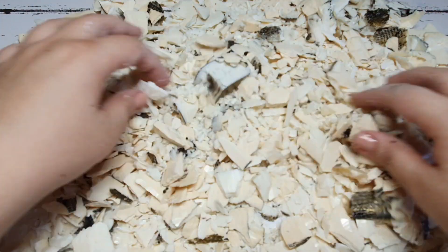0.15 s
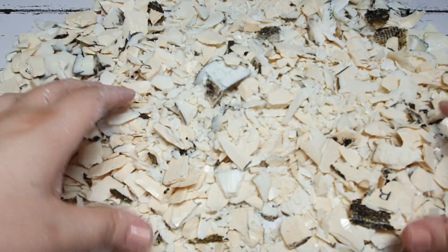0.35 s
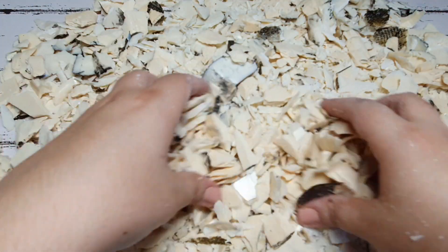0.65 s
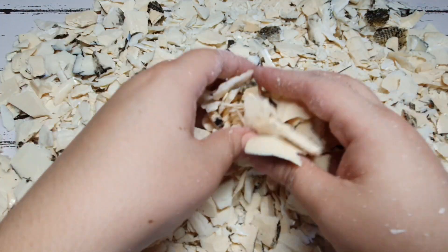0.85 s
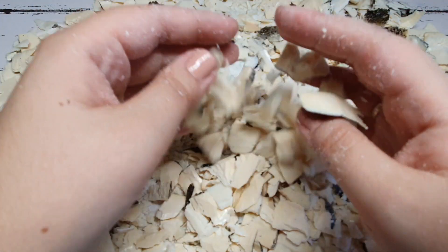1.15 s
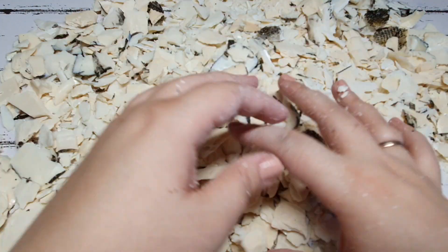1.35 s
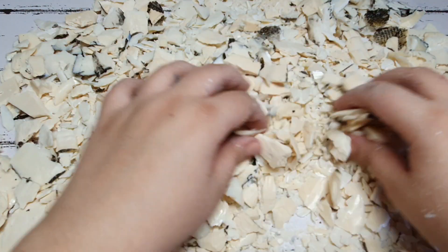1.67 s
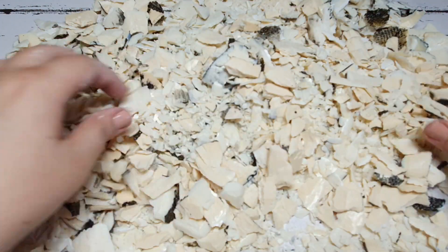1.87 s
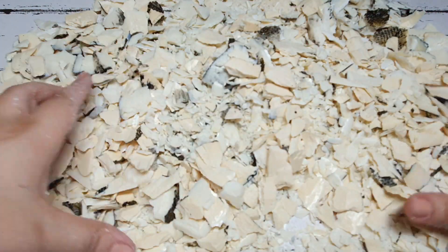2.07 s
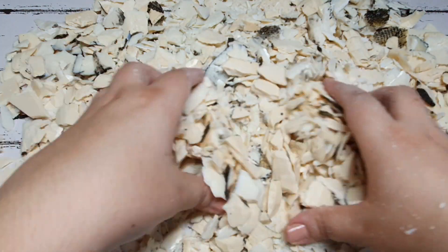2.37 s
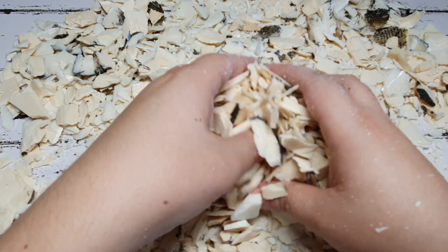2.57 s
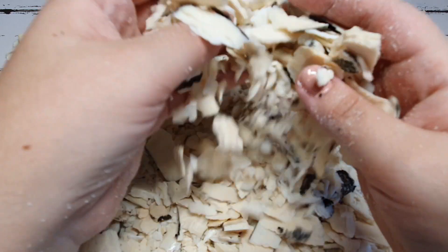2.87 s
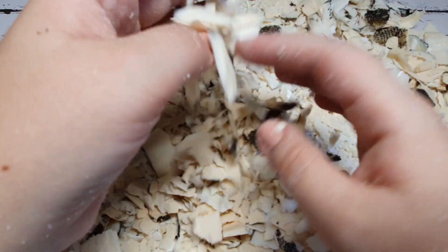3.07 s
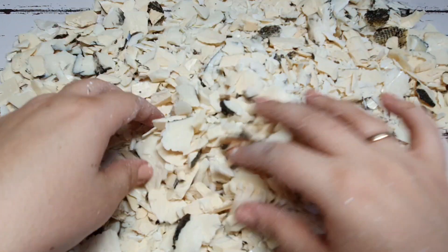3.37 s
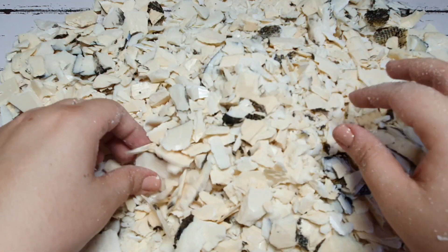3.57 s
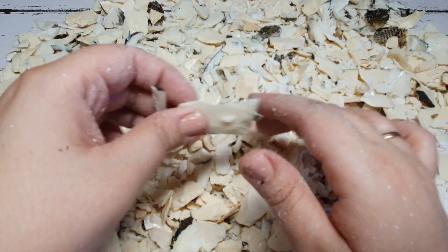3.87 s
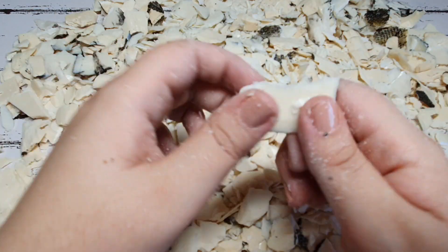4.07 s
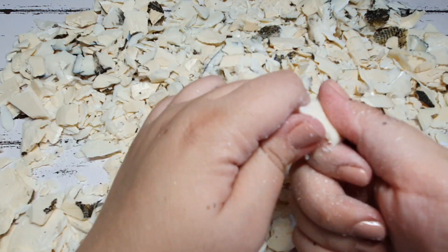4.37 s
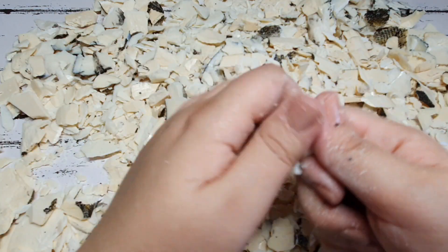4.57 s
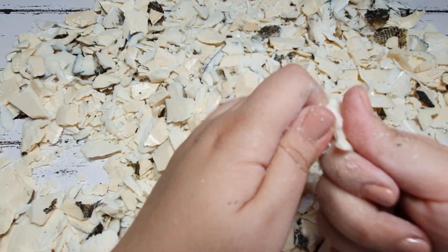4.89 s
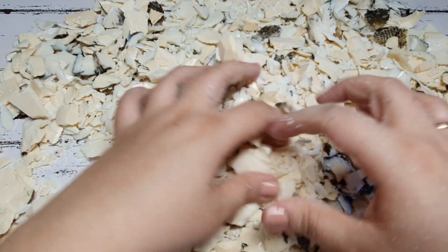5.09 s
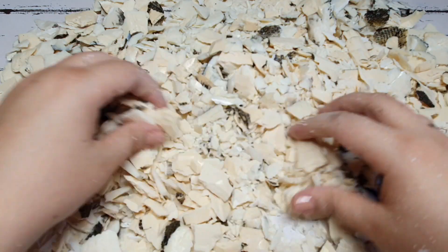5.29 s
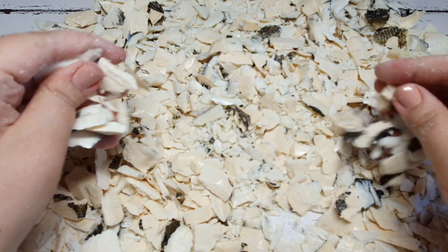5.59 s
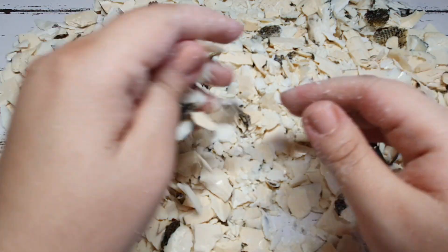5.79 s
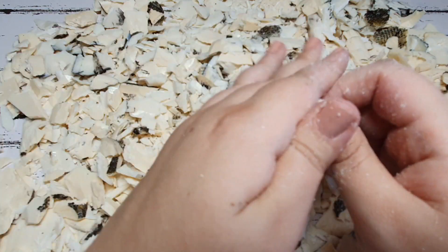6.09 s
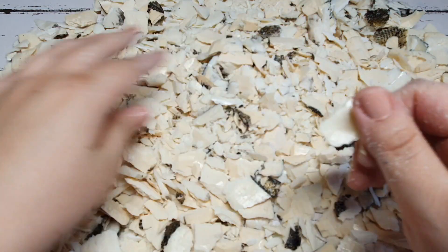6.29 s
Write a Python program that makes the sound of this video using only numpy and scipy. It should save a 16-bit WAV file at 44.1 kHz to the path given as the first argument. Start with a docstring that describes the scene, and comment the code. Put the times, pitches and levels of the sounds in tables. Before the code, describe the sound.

Dry, crunchy rustling of thin soap chips, gathered in swishing sweeps and dropped in crackling showers, recorded very close in a small room. The hollow tabletop booms under the hands, strongest at one thump early on and a cluster near the end. Between them comes near-silence with two loud sharp cracks. Low hum, rumble and faint hiss stay underneath, and the loudest peaks sound slightly overloaded.

```python
"""Dry soap shards crackle first, raked by two hands on a hollow table top close to one microphone.
Each shard contact excites a short damped resonance; single pieces snap with fracture noise and a ring.
The table booms as hands and raked shards drive its modes, and jolts add damped low swings.
A mains hum, room rumble and microphone hiss lie below; loud moments overload the recorder."""
import sys
import numpy as np
from scipy import signal
from scipy.fft import rfft, irfft
from scipy.io import wavfile
from scipy.ndimage import uniform_filter1d

SR = 44100
rng = np.random.default_rng(int(sys.argv[2]) if len(sys.argv) > 2 else 0)


def wav_record(signal):
    """Record a signal, one row per channel, as 16-bit PCM in the file named by sys.argv[1]."""
    frames = np.transpose(np.atleast_2d(signal))
    bounded = np.clip(frames, -1, 1)
    # unit amplitude maps onto the largest positive 16-bit level
    quanta = np.round(bounded * 32767).astype(np.int16)
    wavfile.write(sys.argv[1], SR, quanta)


N = 284004

# Movements of shards in the heap. Each row: start in seconds, rise in seconds, hold in seconds,
# fall in dB per second, then the levels of fine crumbs, flakes and big chunks in dB.
STROKES = [(-0.25, .36, 0.032, 57, -27, -28, -28.5), (0.25, 0.02, 0.15, 80, -53, -47, -35.5),
           (0.44, 0.051, 0.054, 29, -30, -29.5, -24.5), (0.87, 0.019, 0.005, 237, -31.5, -33, -34),
           (0.96, 0.026, 0.0075, 193, -37.5, -33.5, -61.5), (1.07, .11, 0.012, 248, -25.5, -23, -26),
           (1.21, 0.035, 0.0092, 85, -29.5, -27.5, -28), (1.45, 0.053, 0.023, 41, -32.5, -32.5, -23),
           (1.52, .10, 0.23, 104, -29.5, -32, -31), (1.98, 0.085, 0.045, 60, -33.5, -35, -30),
           (2.10, 0.047, 0.034, 66, -31.5, -27, -23), (2.16, 0.11, 0.049, 56, -30.5, -30, -28),
           (2.36, 0.082, 0.062, 17, -33, -34, -36.5), (2.72, 0.18, 0.025, 72.5, -28, -27.5, -30.5),
           (2.99, 0.047, 0.0081, 170, -20.5, -23.5, -26.5), (3.09, 0.036, 0.043, 108, -24.5, -27, -28.5),
           (3.27, 0.063, 0.23, 106, -35, -34, -33.5), (3.495, 0.003, 0.012, 161.5, -36.5, -17, -18.5),
           (3.58, 0.017, 0.14, 101, -47.5, -53, -44.5), (3.74, 0.061, 0.033, 186, -62, -57, -47.5),
           (4.13, 0.0045, 0.0054, 191, -44.5, -41.5, -45.5),
           (4.242, 0.0026, 0.0092, 190, -37.5, -43.5, -39), (4.717, 0.0072, 0.0081, 176, -42, -44, -36),
           (4.89, 0.029, 0.027, 90, -47, -50.5, -51), (4.98, 0.022, 0.14, 40, -43, -43, -40.5),
           (5.05, 0.19, .14, 45, -31, -32.5, -27.5), (5.59, 0.051, 0.093, 326, -33, -35, -48),
           (5.77, 0.096, 0.0092, 215, -39.5, -40, -40.5), (5.92, 0.049, 0.008, 187, -32.5, -37.5, -29),
           (6.02, 0.085, 0.027, 72, -47, -53, -51), (6.305, 0.0056, 0.0086, 132, -48, -51, -42.5),
           (6.405, 0.012, 0.028, 103, -39, -32, -21)]
# The heap settling by itself. Columns: levels of crumbs, flakes and chunks in dB.
HEAP_AT_REST_DB = (-58.5, -81, -68)
# Contact spectra of three shard sizes. Each row: frequency in Hz, relative level in dB.
CRUMB_SPECTRUM = [(4500, -4), (6400, -6), (9000, -6.5), (11300, -12.5), (14000, -15), (16000, -38)]
FLAKE_SPECTRUM = [(1800, 2.5), (2600, 7.5), (3500, 0.5), (4500, 0.5)]
CHUNK_SPECTRUM = [(450, 2), (700, -2.5), (1050, 6), (1400, 1), (2000, -4.5)]
# Single pieces breaking or landing. Each row: start in seconds, level of the whole event in dB,
# dull part in dB and bright part in dB (both before a fixed offset), ring of the piece in Hz.
SNAPS = [(0.257, -16.5, 8, -15, 3200), (0.425, -17.5, 8, -5, 1960), (0.495, -20, -12.5, 6, 4000),
         (0.636, -10.5, -1, -5, 2720), (0.848, -9.5, 2, -23, 2200), (1.001, -7.5, -13, -15.5, 6030),
         (1.179, -13, 6, -6.5, 2900), (1.236, -1.5, -26, -13, 3030), (1.246, -5, -18, -6.5, 6950),
         (1.258, -4, -10, -9, 2730), (1.289, -9, -17, -19, 3850), (1.305, -2.5, -7.5, -9, 2830),
         (1.65, -11, -10, -15, 6000), (1.658, -2.5, 10.5, -21, 3330), (1.684, -17, -20, -9, 5200),
         (1.741, -13, -20, -7, 8750), (1.784, -7, 1, -18, 1850), (1.891, -8, -23, -1.5, 3200),
         (2.042, -13, -31, -0.5, 4600), (2.141, -15.5, 12.5, -18, 2350), (2.17, -11, 9, -17, 2010),
         (2.43, -13.5, -20, -1, 5800), (2.886, -1, -21, -22, 3380), (3.015, -2.5, -16, -24.5, 2340),
         (3.027, -3.5, -17, -16, 2570), (3.062, -4.5, -32, -4, 4340), (3.104, -7, -3, -6, 4790),
         (3.115, -8, -20, -6, 7250), (3.128, -2.5, -15, -11, 2850), (3.137, -1, -25, -8, 2800),
         (3.193, -3, -2.5, -4.5, 6500), (3.249, -19, 12, 0, 3080), (3.412, -22, -6, 5, 4330),
         (3.498, 8, 2.5, -36, 3180), (3.513, -14, 3, -4, 4300), (3.798, -34, 14, -2, 2300),
         (3.862, -33, -8, -22, 2700), (4.113, -33.5, -20, -1, 6470), (4.130, -15.5, -16, -19, 5430),
         (4.133, -21, -1.5, -8, 4430), (4.137, -21.5, -21, 2, 8860), (4.241, -3, -11.5, -1.5, 4860),
         (4.679, -33, -25, -7, 8410), (4.691, -28, -5, 6.5, 2800), (4.693, -14.5, -8, 2, 2780),
         (4.7159, 1, 1.5, -1, 7320), (4.955, -25.5, -24, -3, 5070), (4.902, -35, -21, 7, 6940),
         (5.001, -23, -15, -4, 8920), (5.011, -12.5, -20, -26, 2750), (5.113, -15, 2, -8, 5010),
         (5.222, -19.5, -4, 4, 4300), (5.377, 4.5, -8.5, -22, 3350), (5.421, -12, -8, -15, 3970),
         (5.503, -4, -31, -6, 5760), (5.619, -19, -26, 4, 7720), (5.641, -15, -6, 3.5, 3570),
         (5.648, -9, -22, -4, 6140), (5.663, -13, -18, -8, 4000), (5.699, -8.5, -22, -14, 6000),
         (5.717, -4, -4.5, -7, 5600), (5.774, -8.5, -33, -4.5, 8350), (5.83, -19, -15, -5, 5300),
         (5.847, -18, -26, -4, 6250), (5.857, -15.5, -16, -6, 2470), (5.964, -13, -5, -6, 2340),
         (6.008, -12.5, -6, -2, 2430), (6.046, -18.5, -33, 4.5, 6700), (6.064, -28.5, -28, 8, 8800),
         (6.097, -27, 4, 4.5, 7900), (6.108, -24, -8, 0, 2920), (6.305, -19.5, 5, -7, 5370),
         (6.412, -13.5, -8, -5, 2600)]
# A hand comes down or pushes on the table. Each row: start in seconds, rise in seconds, hold in seconds,
# fall in dB per second, then the levels of first mode, second mode, upper modes and slow sway in dB.
PRESSES = [(0.11, .07, 0.035, 98, -25.5, -50, -37, -35), (0.28, 0.13, 0.04, 56.5, -31, -37, -33, -29),
           (0.55, .05, 0.019, 57, -32.5, -33, -32, -30),
           (0.93, 0.012, 0.052, 346, -21.5, -42.5, -27.5, -30),
           (1.17, 0.11, 0.023, 120, -38, -29, -35, -32), (1.48, 0.017, 0.027, 296, -8, -7.5, -14.5, -16),
           (1.53, 0.018, 0.0067, 358, -17, -6, -24, -28),
           (1.575, 0.018, 0.024, 248, -49, -11.5, -27, -20.5),
           (1.78, 0.093, 0.017, 110, -33, -37, -37, -27), (1.995, 0.018, 0.031, 358, -26.5, -55, -56, -17),
           (2.08, 0.1, 0.041, 50, -24.5, -60, -41, -30), (2.2, 0.095, 0.015, 87, -46, -37, -31, -41),
           (2.9, 0.12, 0.25, 30, -36.5, -32.5, -39, -29.5), (5.12, 0.021, 0.055, 98, -39, -31, -38, -36),
           (5.238, 0.014, 0.014, 278, -14, -9, -31, -26), (5.27, 0.057, 0.009, 190, -18.5, -24, -40, -34),
           (5.405, 0.02, 0.033, 143, -32, -37, -17, -28.5),
           (5.428, 0.016, 0.032, 300, -5.5, -16.5, -25, -20), (5.48, 0.025, 0.015, 302, -3, -24, -25, -20),
           (5.57, 0.015, 0.011, 200, -28, -33, -36, -20), (5.62, 0.016, 0.044, 183.5, -8, -8, -22, -10),
           (5.72, 0.067, 0.014, 81, -23, -48, -54, -33), (5.93, 0.014, 0.0077, 131, -49, -30.5, -37, -29.5),
           (6.40, 0.029, 0.026, 100, -49, -34, -29, -39)]
# The same four table parts with the hands off. Columns: levels in dB.
TABLE_AT_REST_DB = (-61, -59, -56.5, -49)
# The four parts under raking. Columns: levels in dB relative to the weaker of crumbs and chunks.
RUB_DB = (-12, -1.5, -5.5, -6)
# Clear table modes. Columns: frequency in Hz, rms pitch wander in Hz, rms level flutter in dB.
FIRST_MODE = (119, 2, 1.5)
SECOND_MODE = (207, 7, 2.0)
THIRD_MODE = (341, 4, 2.0)
# Broad table modes under light touch. Each row: frequency in Hz, width in Hz, relative level in dB.
SECOND_RUMBLE = [(157.2, 6.4, -8), (185, 96, -1.5), (248.7, 18.5, -3.5)]
UPPER_RUMBLE = [(316.3, 75, 5.5), (452, 57, 0), (528, 78, -3.5)]
# Slow sway of the table. Columns: frequency in Hz, width of each of two filter passes in Hz.
TABLE_SWAY = (80, 35)
# Jolts through the table. Each row: start in seconds, starting level in dB, starting pitch in Hz.
JOLTS = [(4.241, -6.5, 250), (4.716, 0, 270), (6.425, -12.5, 180)]
# Shape of the rumble and hiss. Each row: frequency in Hz, relative spectral level in dB.
ROOM_NOISE = [(30, -24.5), (60, -30), (120, -8.5), (250, -9.5), (400, -45.5), (1000, -63), (3500, -59),
              (5500, -35), (9000, -36.5), (12000, -38), (16000, -70.5)]

RISE_FROM_DB = -16.5   # a movement starts this far below its full level
KNOCK_HZ = 1134   # dull ring of the heap under a landing piece
FIRM_DB = -27   # pressure level around which a mode turns from rumbling to ringing clear
ROOM_T60_S, ROOM_DB, WALL_CUT_HZ = .25, -19, 11000
ROOM_NOISE_DB, HUM_HZ, HUM_DB = -45.5, 48.9, -35.5
CUTOFF_HZ = 15750   # top edge of the recorder's band


def from_db(db):
    """Logarithmic level: decibels become an amplitude gain."""
    return 10 ** (np.asarray(db) / 20)


def rms_one(x):
    """Normalisation: a signal is scaled to unit rms."""
    return x / np.sqrt(np.mean(x ** 2) + 1e-20)


def at_hz(points, hz):
    """Spectral interpolation: levels are read along a logarithmic frequency axis."""
    table_hz, level_db = np.array(points).T
    return np.interp(np.log(hz), np.log(table_hz), level_db)


def drift(rate_hz):
    """Slow random modulation: coarse noise through a double one-pole low-pass, with unit rms."""
    step = 20   # samples between coarse values
    pole = np.exp(-2 * np.pi * step * rate_hz / SR)
    coarse = rng.standard_normal(N // step + 2002)
    slow = signal.lfilter([1], [1, -2 * pole, pole * pole], coarse)[2000:]   # drop the run-in
    return np.interp(np.arange(N) / step, np.arange(len(slow)), rms_one(slow))


def resonance(x, hz, width_hz):
    """Damped oscillator: a two-pole band-pass with gain 1 on top."""
    r = np.exp(-np.pi * width_hz / SR)
    feedforward = [(1 - r * r) / 2, 0, (r * r - 1) / 2]
    feedback = [1, -2 * r * np.cos(2 * np.pi * hz / SR), r * r]
    return signal.lfilter(feedforward, feedback, x + 1e-18)


def band(x, low_hz, high_hz):
    """Band limitation: a Butterworth band-pass."""
    edges_hz = [low_hz, min(high_hz, .45 * SR)]
    return signal.sosfilt(signal.butter(2, edges_hz, "band", fs=SR, output="sos"), x)


def evened(x, span_s):
    """Steady drive: division by the running rms holds a ringing near constant level."""
    power = uniform_filter1d(rms_one(x) ** 2, size=int(span_s * SR))
    return rms_one(x / np.sqrt(power + 0.033))


def gestures(rows, rest_db):
    """Incoherent addition: powers of rising, held and falling movements sum over rest, one dB curve a part."""
    t = np.arange(N) / SR
    power = from_db(2 * np.array(rest_db)[:, None])
    for start, rise, hold, fall, *levels_db in rows:
        since = t - start
        rise_db = RISE_FROM_DB * np.clip(1 - since / max(rise, .001), 0, 1)
        fall_db = fall * np.maximum(since - rise - hold, 0)
        onset = np.clip(since / .005, 0, 1) ** 2   # 5 ms fade-in
        part_power = from_db(2 * np.array(levels_db)[:, None])
        power = power + part_power * from_db(2 * (rise_db - fall_db)) * onset
    return 10 * np.log10(power)


def crackle(spectrum, per_s, spread_db, clump_db, cycles, rustle_db, count):
    """Impulsive excitation: clumped random contacts ring shards of several sizes, over a rustle of dust."""
    born = rng.random(N) < per_s * from_db(clump_db * drift(120)) / SR
    strength = from_db(spread_db * np.minimum(rng.exponential(1, N), 5))
    hits = born * strength * rng.choice([-1, 1], N)
    shard = rng.integers(0, count, N)   # which resonator each contact excites
    dust = rng.standard_normal(N)
    out = 0
    for k, hz in enumerate(np.geomspace(spectrum[0][0], spectrum[-1][0], count)):
        rustle = from_db(rustle_db) * np.roll(dust, 997 * k)   # shifted so that resonators differ
        contacts = rms_one(hits * (shard == k)) + rustle
        ringing = resonance(contacts, hz, hz / cycles)
        out = out + from_db(at_hz(spectrum, hz)) * resonance(ringing, hz, 0.9 * hz)
    return rms_one(out)


def flake_ticks(per_s):
    """Impulse decay: lone flakes tip over as sharp noise bursts in three bands, each falling 60 dB in 4 ms."""
    out = 0
    for low_hz, high_hz in [(1500, 4440), (3500, 7800), (6000, 14000)]:
        clicks = (rng.random(N) < per_s / SR) * from_db(4.5 * rng.standard_normal(N))
        decay = from_db(-60 / (.004 * SR))   # gain per sample
        envelope = signal.lfilter([1], [1, -decay], clicks + 1e-18)
        out = out + envelope * rms_one(band(rng.standard_normal(N), low_hz, high_hz))
    return out


def snaps():
    """Brittle fracture: noise builds within 1 ms, knocks dully on the heap and rings the piece itself."""
    size = 2048
    out = np.zeros(N + size)
    t = np.arange(size) / SR
    fracture = rng.standard_normal((len(SNAPS), 3, size))
    build = np.minimum(t / .001, 1)
    fall_db = -60 * t / .012   # middle noise and ring fall 60 dB in 12 ms
    for (start, level_db, dull_db, bright_db, hz), noise in zip(SNAPS, fracture):
        knock = np.sin(2 * np.pi * KNOCK_HZ * t) + .5 * evened(band(noise[0], 750, 1800), .003)
        dull = from_db(dull_db - 5.5 - 60 * t / 0.013) * knock
        middle = from_db(-9 + fall_db) * evened(band(noise[1], 2300, 5200), .003)
        bright = from_db(bright_db + 3 - 60 * t / .008) * evened(band(noise[2], 5000, 11000), .003)
        ring = from_db(-4 + fall_db) * np.sin(2 * np.pi * hz * t)
        at = int(start * SR)
        out[at:at + size] += from_db(level_db) * build * (dull + middle + bright + ring)
    return out[:N]


def soap_shards(crumbs_db, flakes_db, chunks_db):
    """Size and pitch: crumbs, flakes and chunks ring in successively lower bands, and single pieces snap."""
    crumbs = crackle(CRUMB_SPECTRUM, per_s=2700, spread_db=1.5, clump_db=7.5, cycles=2, rustle_db=-5, count=10)
    # flakes tip only while the heap moves
    moving = np.sqrt(1 - from_db(2 * np.minimum(HEAP_AT_REST_DB[0] - crumbs_db, 0)))
    crumbs = crumbs + from_db(6) * moving * flake_ticks(per_s=85)
    flakes = crackle(FLAKE_SPECTRUM, per_s=900, spread_db=2.5, clump_db=5, cycles=6, rustle_db=-5, count=10)
    chunks = crackle(CHUNK_SPECTRUM, per_s=770, spread_db=2.5, clump_db=3.5, cycles=8.5, rustle_db=-1.5, count=12)
    heap = from_db(crumbs_db) * crumbs + from_db(flakes_db) * flakes + from_db(chunks_db) * chunks
    return heap + snaps()


def held_mode(hz, wander_hz, flutter_db):
    """Sustained oscillation: friction keeps a table mode going; the hand's load shifts its pitch a little."""
    phase = 2 * np.pi * np.cumsum(hz + wander_hz * drift(6.13)) / SR
    return np.sqrt(2) * from_db(flutter_db * drift(15)) * np.sin(phase)


def rubbed_modes(modes):
    """Noise excitation: one friction noise drives broad table modes of alternating sign."""
    push = rng.standard_normal(N)
    rumble = 0
    for k, (hz, width_hz, db) in enumerate(modes):
        rumble = rumble + (-1) ** k * from_db(db) * rms_one(resonance(push, hz, width_hz))
    return evened(band(rumble, 47, 950), 0.099)


def pressed(level_db, mode, rumble, most_clear):
    """Pressure-dependent friction: light touch only rumbles; firm pressure brings out the clear mode."""
    clear = most_clear / (1 + from_db(3 * (FIRM_DB - level_db)))   # share of the power
    return from_db(level_db) * (np.sqrt(clear) * held_mode(*mode) + np.sqrt(1 - clear) * rubbed_modes(rumble))


def jolts():
    """Damped oscillation: each low swing through the table is slower and much weaker than the last."""
    out = np.zeros(N)
    for start, level_db, hz in JOLTS:
        t = np.maximum(np.arange(N) / SR - start, 0)
        swing = np.sin(2 * np.pi * hz * t / (1 + 90 * t))
        out -= from_db(level_db - 14 * hz * t) * swing
    return out


def table(raked_db):
    """Forced vibration: raked shards and pressing hands drive the table's modes, and jolts add swings."""
    pressing_power = from_db(2 * gestures(PRESSES, TABLE_AT_REST_DB))
    raking_power = from_db(2 * (np.array(RUB_DB)[:, None] + raked_db))
    first_db, second_db, upper_db, sway_db = 10 * np.log10(pressing_power + raking_power)
    sway = resonance(resonance(rng.standard_normal(N), *TABLE_SWAY), *TABLE_SWAY)
    out = from_db(first_db) * held_mode(*FIRST_MODE) + from_db(sway_db) * evened(sway, 0.073)
    out += pressed(second_db, SECOND_MODE, SECOND_RUMBLE, most_clear=.85)
    out += pressed(upper_db, THIRD_MODE, UPPER_RUMBLE, most_clear=.5)
    return out + jolts()


def room(x):
    """Reverberation: convolution with exponentially dying noise, dulled by the walls."""
    t = np.arange(SR // 2) / SR
    tail = rng.standard_normal(len(t)) * from_db(-60 * t / ROOM_T60_S) * (t > .003)
    tail = band(tail, 440, WALL_CUT_HZ)
    return signal.fftconvolve(x, tail / np.sqrt(np.sum(tail ** 2)))[:N]


def background():
    """Stationary noise: room rumble and microphone hiss share one spectrum, beside a slightly wavering hum."""
    hz = np.maximum(np.fft.rfftfreq(N, 1 / SR), 1)
    shape = from_db(at_hz(ROOM_NOISE, hz)) * (hz > 20)
    noise = irfft(rfft(rng.standard_normal(N)) * shape, N)
    hum = np.sqrt(2) * np.sin(2 * np.pi * np.cumsum(HUM_HZ + 0.73 * drift(3.2)) / SR)
    return from_db(ROOM_NOISE_DB) * rms_one(noise) + from_db(HUM_DB + 2.5 * drift(7.3)) * hum


def scene():
    """Superposition: soap shards with the room's answer add to the table and the background."""
    crumbs_db, flakes_db, chunks_db = gestures(STROKES, HEAP_AT_REST_DB)
    soap = soap_shards(crumbs_db, flakes_db, chunks_db)
    # only broad movements, with crumbs and chunks together, drag on the table
    raked_db = uniform_filter1d(np.minimum(crumbs_db, chunks_db), size=4000)
    return (soap + from_db(ROOM_DB) * room(soap) + table(raked_db) + background())[None]


def record(dry):
    """Band limits and overload: the deepest bass is lost, peaks hit a hard ceiling, the top is cut."""
    bass_cut = signal.sosfilt(signal.butter(2, 36, "high", fs=SR, output="sos"), dry)
    ceiling = np.clip(bass_cut, -.99, .99)
    return signal.sosfilt(signal.ellip(12, .2, 85, CUTOFF_HZ, fs=SR, output="sos"), ceiling)


dry = scene()
out = record(dry)
wav_record(out)
```